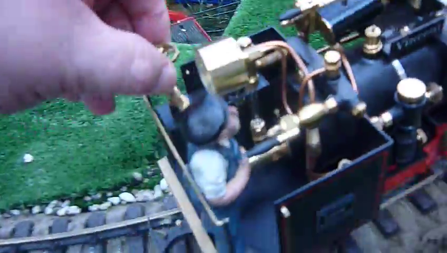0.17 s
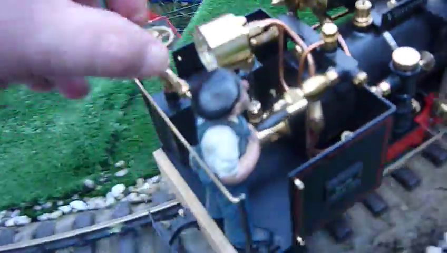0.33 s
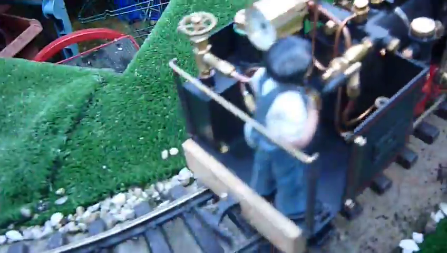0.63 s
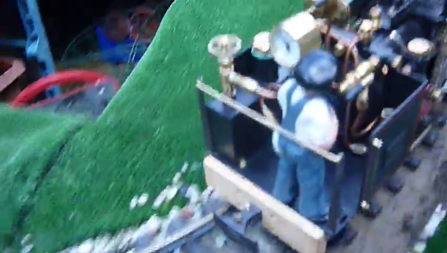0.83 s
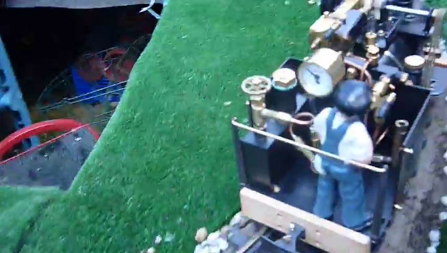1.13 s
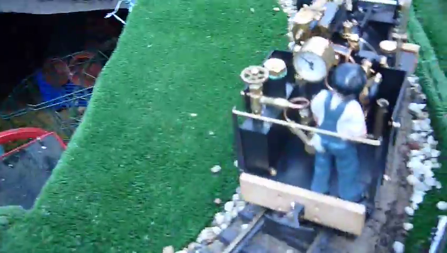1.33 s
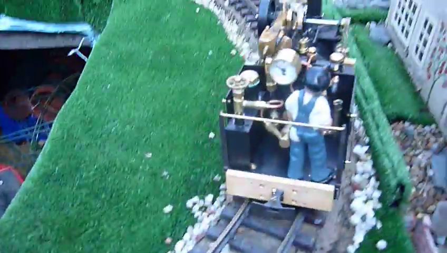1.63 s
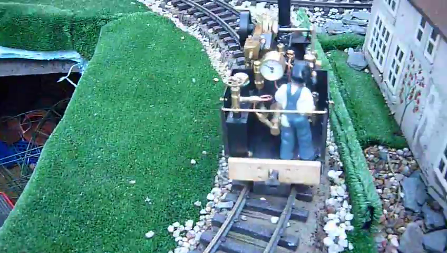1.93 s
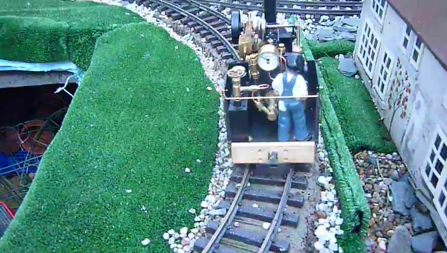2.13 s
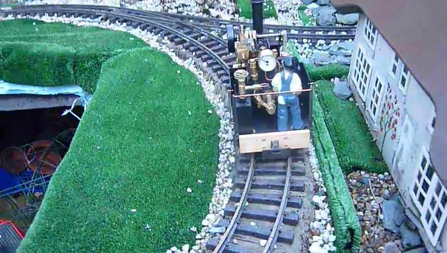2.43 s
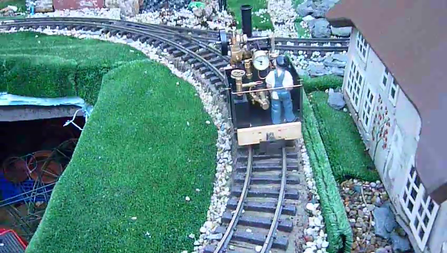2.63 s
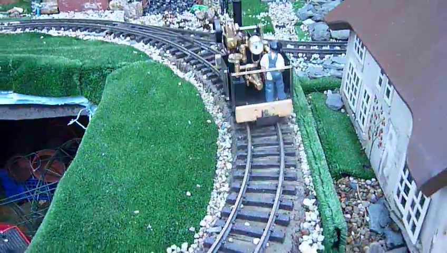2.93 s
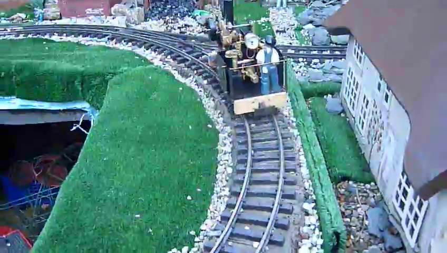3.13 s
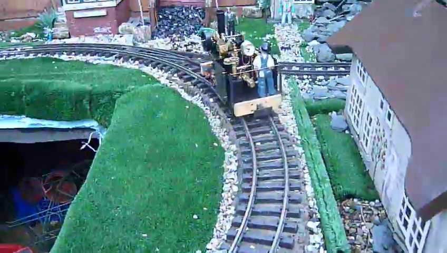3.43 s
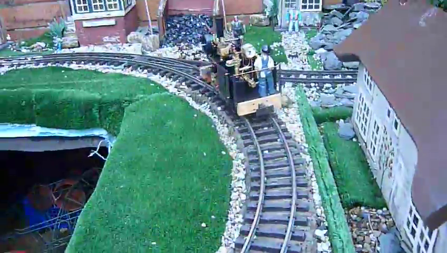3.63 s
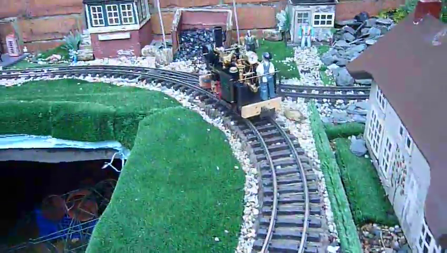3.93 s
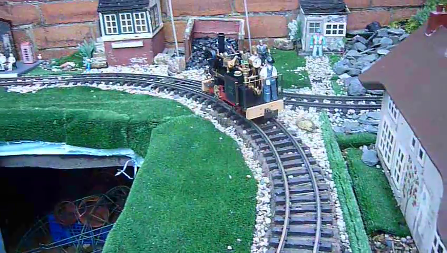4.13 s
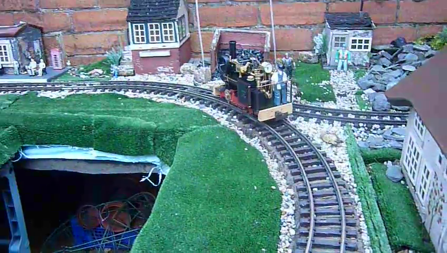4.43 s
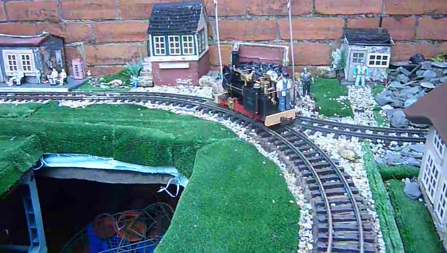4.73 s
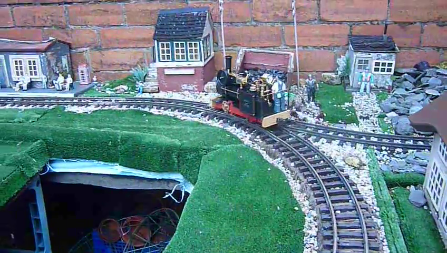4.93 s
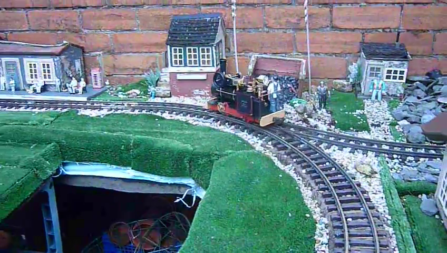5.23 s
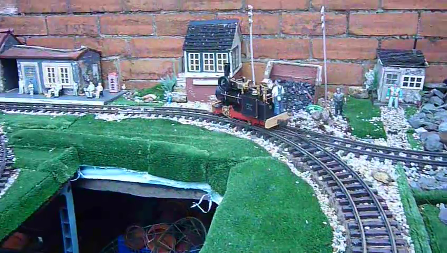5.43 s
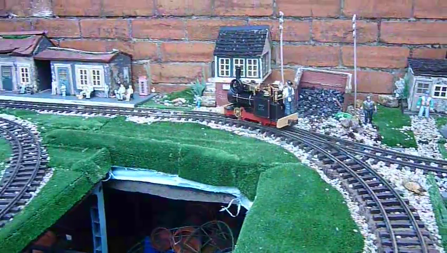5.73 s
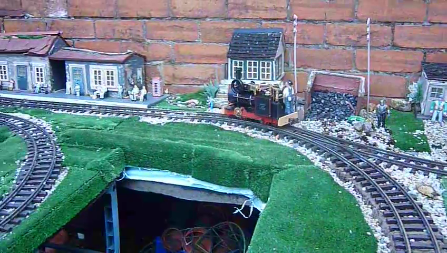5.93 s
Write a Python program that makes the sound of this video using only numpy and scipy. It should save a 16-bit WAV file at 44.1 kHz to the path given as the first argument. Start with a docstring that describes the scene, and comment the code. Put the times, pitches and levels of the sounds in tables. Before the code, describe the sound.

A small model steam engine chuffs very rapidly with a hissing, fluttering rasp, fading as it rolls away, with dull handling thumps on the microphone.

```python
"""On a garden track, a small gas-fired model steam locomotive pulls away from a hand-held camera.
Four quick chuffs to each wheel turn shape noise into hiss and hollow puffs, and ring the chimney and smokebox.
Short echoes colour the engine. Below lie the burner's low roar and drone and the rumble of rolling wheels.
Dull thumps and lumpy rumbles come from the hand on the camera."""
import sys
import numpy as np
from scipy import signal
from scipy.fft import rfft, irfft
from scipy.io import wavfile

SR = 44100
rng = np.random.default_rng(int(sys.argv[2]) if len(sys.argv) > 2 else 0)


def inscribe(sig):
    """Save sig as 16-bit PCM at rate SR to the path in sys.argv[1].

    A 1-D sig is mono; a 2-D sig holds one channel per row.
    Samples are clipped to [-1, 1] before scaling.
    """
    pcm = np.round(np.clip(np.atleast_2d(sig).T, -1, 1) * 32767)
    wavfile.write(sys.argv[1], SR, pcm.astype(np.int16))


N = 267687  # length in samples
TIME = np.arange(N) / SR  # seconds
HZ = np.fft.rfftfreq(N, 1 / SR)

# The engine draws away, then turns across the view. Each row: time in seconds, distance in metres.
ENGINE_DISTANCE = [(0, 0.33), (.9, 0.43), (1.85, .7), (2.5, 1.03), (3.3, 1.33), (4.5, 1.5), (5, 1.65),
                   (6.07, 1.78)]


def amp(db):
    """Turns decibels into a plain gain."""
    return 10 ** (np.asarray(db) / 20)


def unit(x):
    """Scales a sound to an rms (average strength) of one."""
    return x / np.sqrt(np.mean(x ** 2) + 1e-20)


def curve(rows):
    """Draws each column of a timed table out to every sample, with straight lines between rows."""
    s, *columns = np.transpose(rows)
    return np.squeeze([np.interp(TIME, s, column) for column in columns])


def noise(spectrum):
    """Makes noise of a given colour, falling steeply beyond the ends of its table."""
    hz, db = np.transpose(spectrum)
    high_skirt = 1 / (1 + (HZ / (2 * hz[-1])) ** 4)
    low_skirt = 1 / (1 + (hz[0] / (2 * HZ + 1)) ** 4)
    colour = amp(np.interp(np.log(HZ + 1), np.log(hz), db))
    white = rng.standard_normal(N)
    return unit(irfft(rfft(white) * high_skirt * low_skirt * colour, N))


def drift(rate_hz):
    """Random wander of unit size, keeping little that is faster than the given rate."""
    white = rng.standard_normal(N)
    return unit(irfft(rfft(white) * np.exp(-(HZ / rate_hz) ** 2), N))


def resonate(x, hz, width_hz):
    """A resonance with steep skirts: shift its moving pitch down to zero, smooth, and shift back."""
    turn = np.exp(2j * np.pi * np.cumsum(hz * np.ones(N)) / SR)
    r = np.exp(-np.pi * width_hz / SR)
    smoothed = signal.lfilter([1], [1, -2 * r, r * r], x / turn)
    return unit((turn * smoothed).real)


def strokes():
    """Exhaust beats counted from the start, the number of each, and its timing and strengths."""
    # Engine speed. Each row: time in seconds, chuffs per second.
    speed = [(0.0, 28.62), (0.56, 31.93), (1.16, 29.9), (2.31, 31.78), (3.08, 31.43), (3.73, 29.31),
             (4.24, 31.99), (4.58, 31.69), (5.08, 30.24), (5.92, 34.34), (6.07, 31.92)]
    # The four beats of a wheel turn. Each row: lateness in beats, relative hiss in dB, relative puff in dB.
    turn_beats = [(.01, -3.5, 1.5), (.03, -3, -2), (-0.024, -3, 1.5), (0.024, -3, -2)]
    start_beat = .555
    beats = start_beat + np.cumsum(curve(speed)) / SR
    number = beats.astype(int)
    return beats, number, np.array(turn_beats)[number % len(turn_beats)].T


def blast(opening, hold, fade_db, leak_db):
    """Steam flow: the valve opens, the cylinder empties, a little leaks on. Times are in beats."""
    beats, number, (late, hiss_db, puff_db) = strokes()
    age = beats - number - late
    valve = np.sin(np.pi / 2 * np.clip(age / opening, 0, 1)) ** 2
    closing = np.clip((1 - beats + number) * 10, 0, 1)  # shuts over the last tenth of the beat
    emptying = amp(-fade_db * np.maximum(age - hold, 0))  # fade_db is dB per beat
    flow = valve * closing * emptying + amp(leak_db)
    return flow, number, hiss_db, puff_db


def uneven(number, spread_db):
    """Gives each stroke a random strength, as no two are quite equal."""
    return amp(spread_db * rng.standard_normal(N)[number])


def farther(db_per_doubling):
    """Change of level in dB with the engine's distance, zero at one metre."""
    return -db_per_doubling * np.log2(curve(ENGINE_DISTANCE))


def receding(near, far, away_s):
    """Noise whose colour turns from near to far as the engine leaves."""
    far_share = np.clip(TIME / away_s, 0, 1) ** 2
    return np.sqrt(1 - far_share) * noise(near) + np.sqrt(far_share) * noise(far)


def jet(level_db=-42.5, falloff_db=6, spread_db=1.25, spit_db=1.24):
    """Wet steam bursts from the blast pipe: spitting noise that follows the steam flow."""
    # Colour of the steam close by and far off. Each row: frequency in Hz, relative level in dB.
    jet_near = [(900, -16.5), (1500, -3.5), (2000, -9), (2450, -2.5), (3400, 0.5), (4300, 0), (4700, 2),
                (5400, 4.5), (5750, 4.5), (6300, -6), (6900, -4.5), (7400, -2), (8000, -1.5), (8500, -15.5)]
    jet_far = [(900, -17.5), (1500, -12.5), (1950, -15.5), (2450, -19), (3450, -2), (4200, 1), (4900, 2.5),
               (5300, 0.5), (5750, 2.3), (6250, -9), (6850, -5), (7400, -1.5), (7900, 0), (8500, -14)]
    flow, number, hiss_db, _ = blast(opening=0.19, hold=0.31, fade_db=36.5, leak_db=-23)
    steam = receding(jet_near, jet_far, away_s=2.67) * amp(spit_db * drift(450))
    bursts = unit(steam * flow * amp(hiss_db) * uneven(number, spread_db))
    return amp(level_db + farther(falloff_db)) * bursts


def chimney(level_db=-42.5, falloff_db=4.5, spread_db=1.3, wander_hz=38, waver_db=1,
            sing_db=-51, sing_falloff_db=5):
    """Each blast sets the chimney ringing, a sharp core within a broad peak; a thinner note sings above it."""
    # The chimney's ring. Each row: time in seconds, pitch in Hz before its wander, relative strength in dB.
    ring_table = [(0, 2950, -3), (.25, 3006, 0), (.78, 2846, -3.5), (1.1, 2744, 2.5), (1.42, 2855, 0),
                  (2.4, 2910, 3.5), (3.3, 2864, 0), (4, 2827, -1.5), (4.4, 2840, 0), (4.95, 2825, -1.5),
                  (5.17, 2845, 1.5), (5.55, 2800, -2), (5.9, 2790, 3), (6.07, 2790, 2.5)]
    # A thin steam note that shifts as the engine turns on the curve.
    # Each row: time in seconds, relative strength in dB, pitch in Hz.
    sing_table = [(0, -9, 5800), (.35, -3, 5670), (.62, 0, 5280), (1.25, 1, 5210), (1.5, -8, 5310),
                  (2.3, -5, 4870), (4.15, -11, 4800), (4.6, 1.5, 4860), (6.07, -2.5, 5720)]
    flow, number, hiss_db, _ = blast(opening=.12, hold=0.43, fade_db=32.0, leak_db=-25.5)
    strength = flow * amp(hiss_db + waver_db * drift(4.3)) * uneven(number, spread_db)
    drive = strength * rng.standard_normal(N)

    ring_hz, ring_db = curve(ring_table)
    pitch = ring_hz + wander_hz * drift(25)
    broad = resonate(drive, pitch, width_hz=420)
    core = amp(-4.0) * resonate(drive, pitch, width_hz=143)
    ring = amp(level_db + ring_db + farther(falloff_db)) * unit(broad + core)

    note_db, note_hz = curve(sing_table)
    note = resonate(drive, note_hz, width_hz=300)
    return ring + amp(sing_db + note_db + farther(sing_falloff_db)) * note


def puff(level_db=-47.5, falloff_db=5.0, spread_db=0.9):
    """The hollow body of the chuff: lower noise that swells more slowly, strong and weak in turn."""
    # Colour of the smokebox puff close by and far off. Each row: frequency in Hz, relative level in dB.
    puff_near = [(200, -20), (400, -0.5), (520, -7.5), (620, -4), (710, 3), (790, -2), (900, 4), (1020, -1),
                 (1130, -2.5), (1250, -5), (1600, -5), (2050, -9.5), (2500, -7), (2900, -18)]
    puff_far = [(200, -7.5), (400, -3.5), (530, 3.5), (640, 1.5), (790, -4), (910, 4.5), (1010, 3),
                (1200, -6.5), (1550, -4), (1930, -10), (2250, -5.5), (2700, -24)]
    flow, number, _, puff_db = blast(opening=0.31, hold=0.22, fade_db=23, leak_db=-5.5)
    steam = receding(puff_near, puff_far, away_s=1.6)
    puffs = unit(steam * flow * amp(puff_db) * uneven(number, spread_db))
    return amp(level_db + farther(falloff_db)) * puffs


def throb(level_db=-54.5, falloff_db=9, strike=.3, accent=1.8, spread_db=2.5):
    """The pressure kick of each beat rings the air in flue and smokebox, most of all on the strong beats."""
    # Ringing of the air in flue and smokebox.
    # Each row: pitch in Hz, width in Hz, relative strength in dB before width scaling and filtering.
    air_modes = [(200.5, 33, -1.5), (676, 50, -10), (884, 48, -4), (1112, 150, -18)]
    beats, number, (_, _, puff_db) = strokes()
    clicks = np.diff(np.floor(beats - strike), prepend=0)  # one click, part way into each beat
    kicks = clicks * amp(accent * puff_db) * uneven(number, spread_db)
    t = np.arange(SR // 8) / SR
    ringing = np.zeros(len(t))
    for hz, width, db in air_modes:
        fade = np.exp(-np.pi * width * t)
        ringing += amp(db) * np.sqrt(width) * fade * np.cos(2 * np.pi * hz * t)
    band = signal.butter(2, [130, 1400], "band", fs=SR, output="sos")
    ringing = signal.sosfilt(band, ringing)
    return amp(level_db + farther(falloff_db)) * unit(signal.oaconvolve(kicks, ringing)[:N])


def garden(x):
    """Short echoes slide and gain on the direct sound as the engine leaves, so the hiss drifts in colour."""
    # Reflections from the garden wall, the model buildings and the track bed.
    # Each row: delay in ms close by, delay in ms far off, gain before the loss over the longer path.
    echoes = [(8.5, 1.002, 0.19), (6.2, 4.9, 0.57), (1.608, 2.095, 0.29)]
    metres = curve(ENGINE_DISTANCE)
    away = (metres - metres.min()) / np.ptp(metres)
    out = x.copy()
    for near_ms, far_ms, gain in echoes:
        delay_s = (near_ms + (far_ms - near_ms) * away) / 1000
        spreading = metres / (metres + 343 * delay_s)  # sound travels 343 m/s
        out += gain * spreading * np.interp(TIME - delay_s, TIME, x)
    return out


def burner(level_db=-51.0, falloff_db=9.0, flutter_db=0.55, drone_db=-6, roar_db=-1.0):
    """The burner roars and drones in its flue, loud only close to the cab: coloured noise and a resonance."""
    # Colour of the roar. Each row: frequency in Hz, relative level in dB.
    flue_colour = [(40, -40), (90, -37.5), (135, -5.5), (175, -7.5), (208, 1), (245, -7), (330, -11.5),
                   (480, -27.5), (900, -36.5)]
    roar = amp(roar_db) * noise(flue_colour)
    drone = amp(drone_db) * resonate(rng.standard_normal(N), 212, width_hz=39)
    return amp(level_db + farther(falloff_db) + flutter_db * drift(21)) * (roar + drone)


def wheels(level_db=-49.0, jolt_db=2.0, bend_db=5, bend_s=2.1, bend_length_s=1.0):
    """The wheels roll over uneven rails: jolting noise, louder as they enter the bend."""
    # Colour of the rolling. Each row: frequency in Hz, relative level in dB.
    rail_colour = [(25, -30), (120, 7.5), (400, 3), (560, 0.5), (760, -2), (960, -9.5), (1220, -4.5),
                   (1600, -3.5), (2000, -15.5), (2850, -2), (3500, -5.5), (5300, -9.5), (6500, -8.5),
                   (8300, -27.5)]
    bend = np.exp(-((TIME - bend_s) / bend_length_s) ** 2)
    return amp(level_db + bend_db * bend + jolt_db * drift(44)) * noise(rail_colour)


def thumps(level_db=0, cycles=0.38, shell_hz=320, shell_db=-12, shell_s=0.0017):
    """Soft blows swing the camera for a cycle or two, knock its shell and rebound once."""
    # Handling thumps. Each row: time in seconds, strength in dB before filtering, pitch of the swing in Hz.
    blow_table = [(0.956, -29.5, 95), (1.21, -22, 129), (1.657, -18.5, 180), (1.783, -15.5, 200),
                  (1.887, -19, 155), (2.146, -13.5, 217), (2.161, -11.5, 211), (2.172, -20, 129),
                  (2.308, -28.5, 130), (2.478, -22.5, 196), (2.56, -23.5, 128), (2.701, -19, 237),
                  (2.778, -27, 190), (3.352, -18.5, 175), (3.397, -18, 196), (3.467, -26, 150),
                  (3.574, -18, 178), (3.581, -16.5, 147), (3.619, -23.5, 241), (3.657, -12, 220),
                  (3.787, -24.5, 158), (3.955, -29.5, 108), (4.192, -29, 172), (4.421, -33, 105),
                  (4.588, -29, 212), (4.998, -8, 149), (5.127, -33, 129), (5.904, -21.5, 146)]
    rebound_s, rebound_db = 0.0089, -13.5  # the camera rocks back after each thump
    blows = np.zeros(N)
    t = np.arange(SR // 20) / SR
    shell_swell = t / shell_s * np.exp(1 - t / shell_s)  # peaks at shell_s
    shell = amp(shell_db) * shell_swell * np.sin(2 * np.pi * shell_hz * t)
    for s, db, hz in blow_table:
        swell = t * hz / cycles  # the swing is fullest after this many cycles
        swing = swell * np.exp(1 - swell) * np.sin(2 * np.pi * hz * t)
        for start, strength_db in (s, db), (s + rebound_s, db + rebound_db):
            part = blows[round(start * SR):][:len(t)]
            part += amp(strength_db) * (swing + shell)[:len(part)]
    blows = signal.sosfilt(signal.butter(4, 650, fs=SR, output="sos"), blows)  # dulls the blows
    return amp(level_db) * signal.sosfilt(signal.butter(1, 55, "high", fs=SR, output="sos"), blows)


def grip(level_db=-0.5, lump_db=4, rest_db=-62, slips_per_s=110, slip_db=8, slip_hz=200, slip_s=0.0023):
    """Each shift of the hand swells and fades as a lumpy rumble in the camera's case, with small finger slips."""
    # The hand shifts its hold. Each row: start in seconds, length in seconds,
    # strength in dB before the level of the rumble or slips is added.
    grip_table = [(1.101, .2, -44), (1.549, .8, -42.5), (2.4, 0.52, -41), (3.298, .09, -35),
                  (3.55, 0.17, -35.5), (3.75, 0.16, -44), (4.075, .55, -47.5), (5.95, .14, -47.5)]
    # Colour of the case's rumble. Each row: frequency in Hz, relative level in dB.
    case_colour = [(25, -23), (60, 3.5), (110, 6.5), (180, -2), (280, -4.5), (450, -26), (800, -37.5),
                   (1500, -72.5)]
    rub = np.zeros(N)
    for s, length, db in grip_table:
        rub += amp(db) * np.sin(np.pi * np.clip((TIME - s) / length, 0, 1))
    lumpy = unit(noise(case_colour) * amp(lump_db * drift(36)))
    rumble = (amp(rest_db) + amp(level_db) * rub) * lumpy

    slipping = rng.random(N) < slips_per_s / SR
    slips = rub * slipping * rng.uniform(-0.94, 1, N)
    t = np.arange(SR // 20) / SR
    knock = t / slip_s * np.exp(1 - t / slip_s) * np.sin(2 * np.pi * slip_hz * t)
    return rumble + amp(slip_db) * signal.oaconvolve(slips, knock)[:N]


def scene():
    """Adds the engine with its echoes, the burner, the wheels and the camera noise at one microphone."""
    engine = garden(jet() + chimney() + puff() + throb())
    return (engine + burner() + wheels() + thumps() + grip())[None]


def record(dry, edge_hz=8600, offset=-.056):
    """A narrow-band recorder cuts the high treble, and its signal rests slightly off zero."""
    low_pass = signal.firwin(161, edge_hz, window=("kaiser", 8), fs=SR)
    return signal.oaconvolve(dry, low_pass[None], "same") + offset


dry = scene()
out = record(dry)
inscribe(out)
```